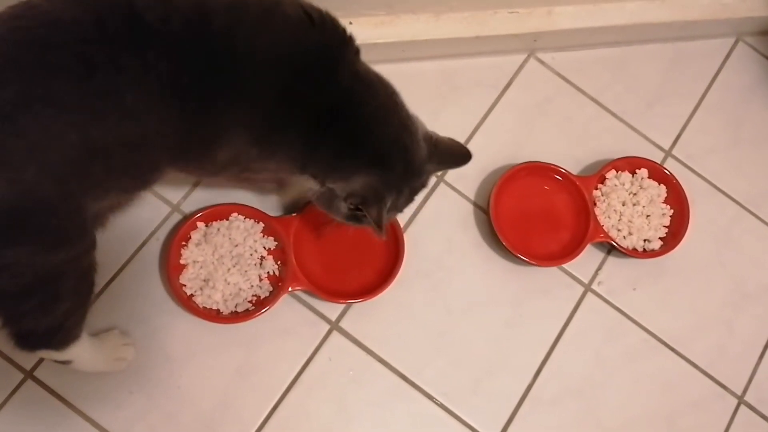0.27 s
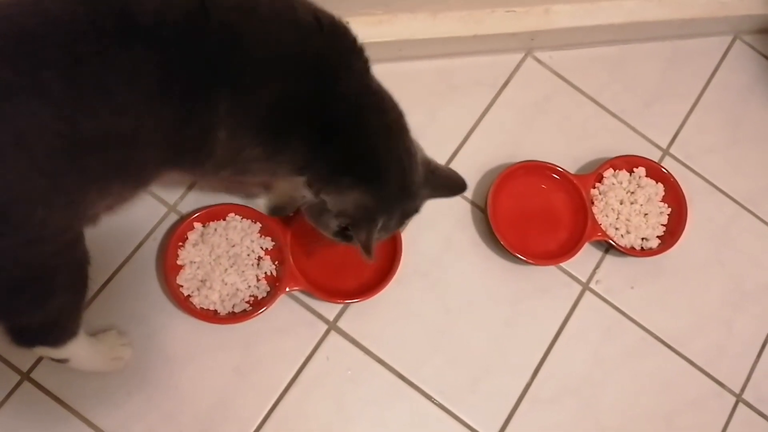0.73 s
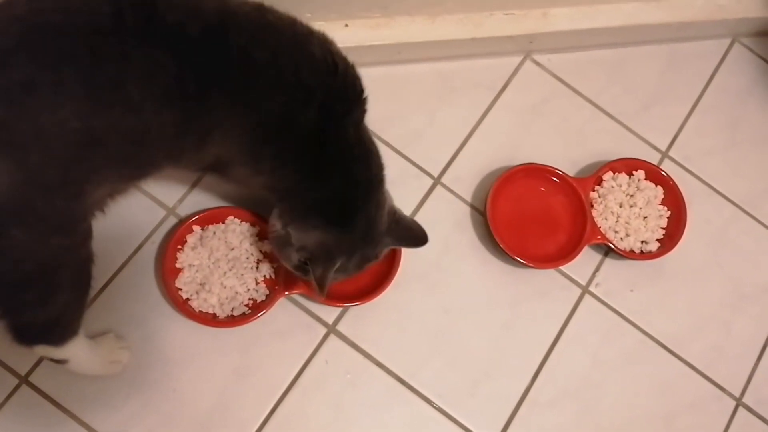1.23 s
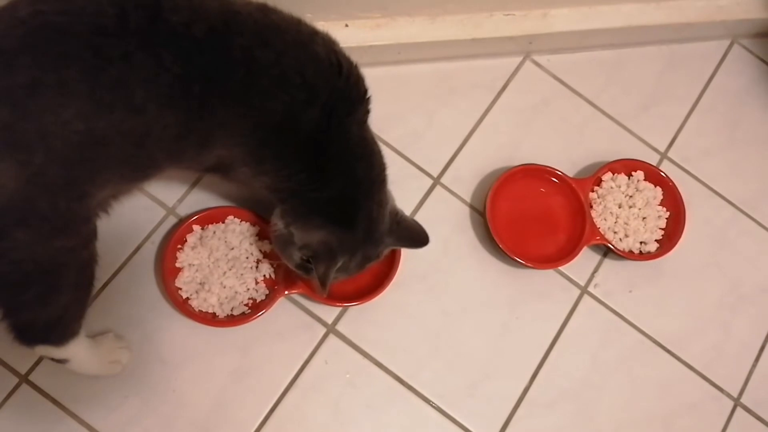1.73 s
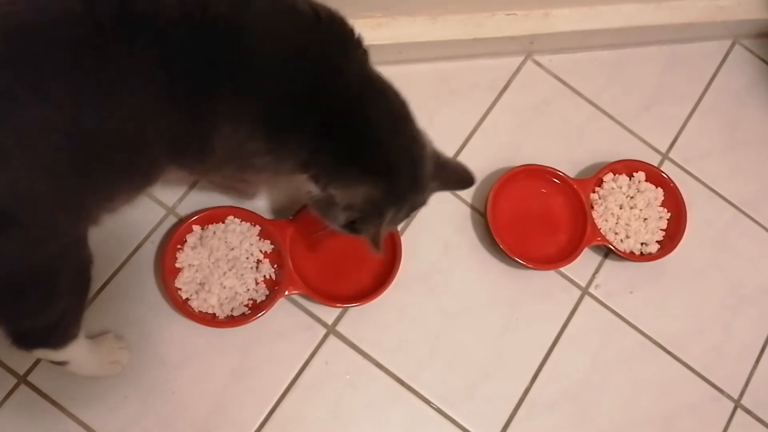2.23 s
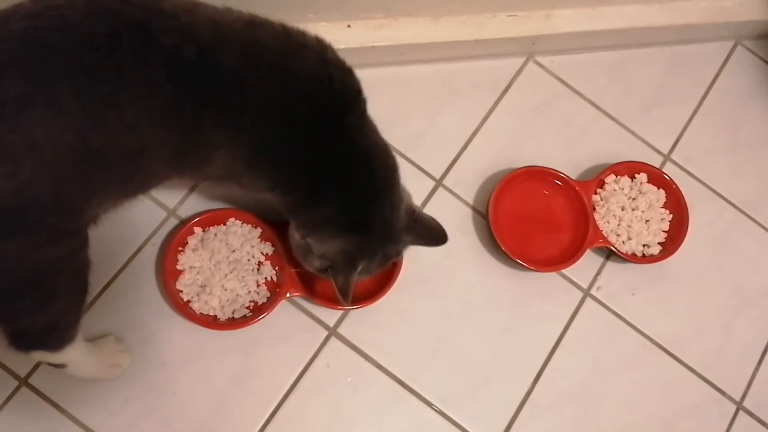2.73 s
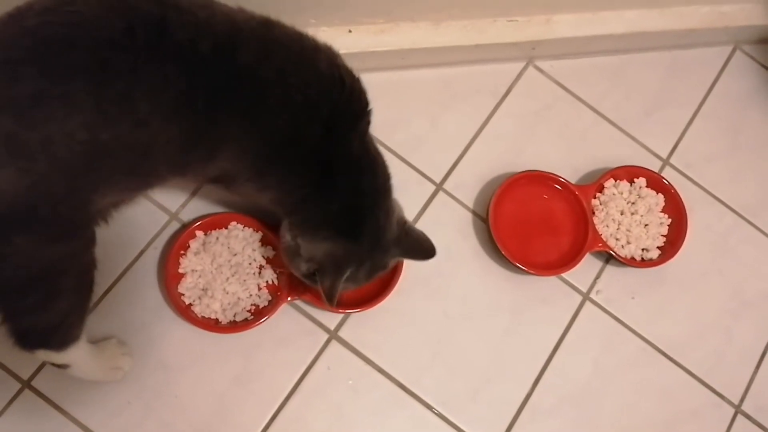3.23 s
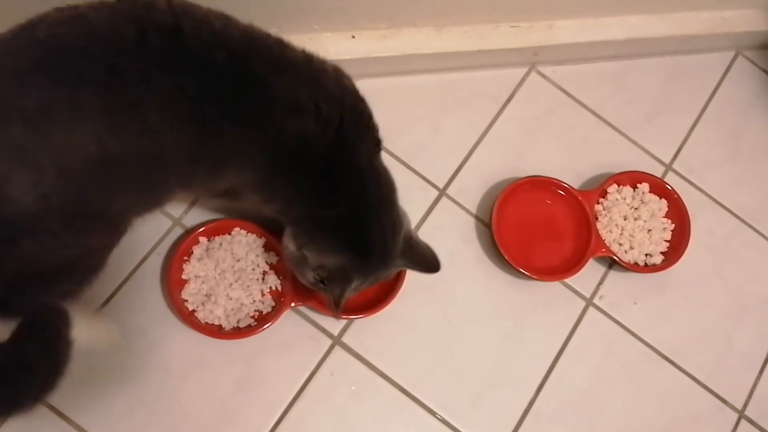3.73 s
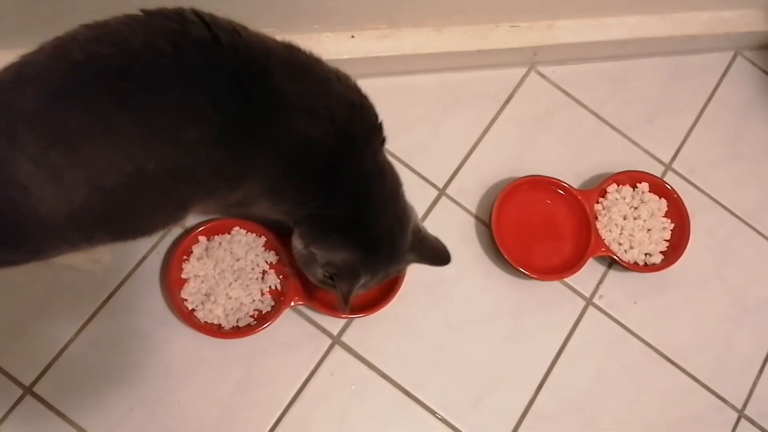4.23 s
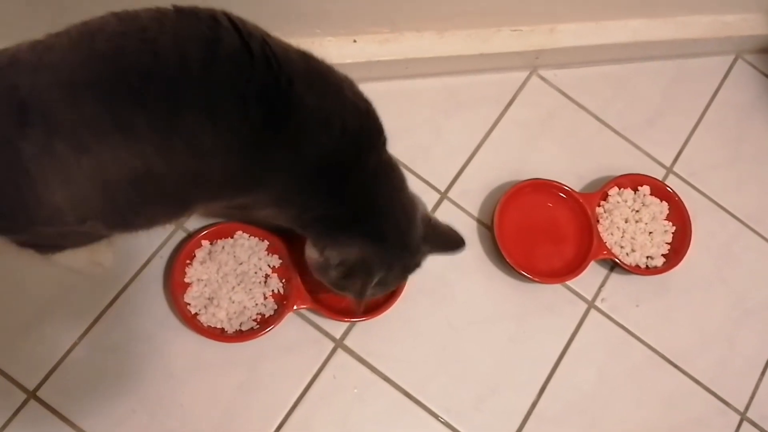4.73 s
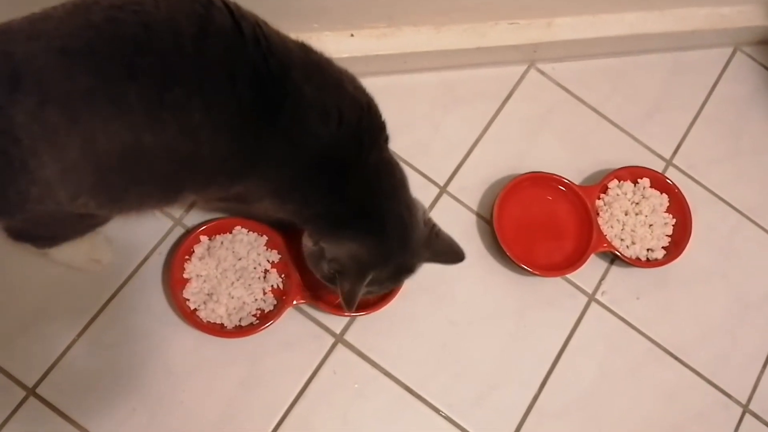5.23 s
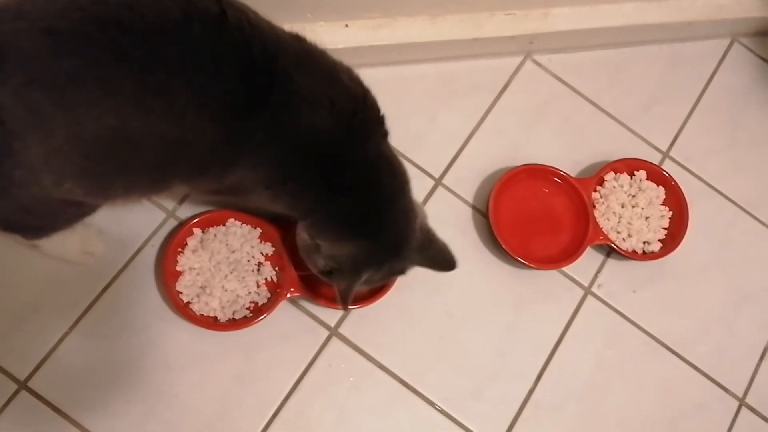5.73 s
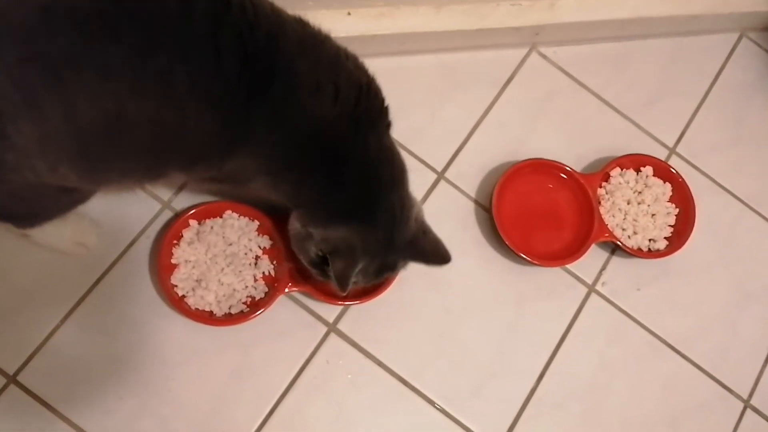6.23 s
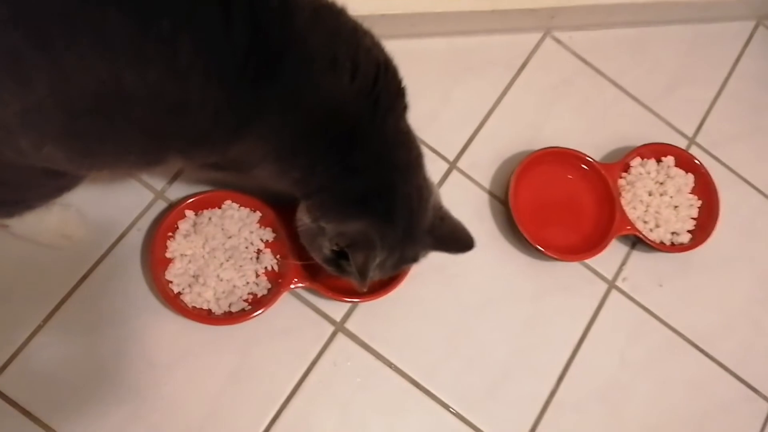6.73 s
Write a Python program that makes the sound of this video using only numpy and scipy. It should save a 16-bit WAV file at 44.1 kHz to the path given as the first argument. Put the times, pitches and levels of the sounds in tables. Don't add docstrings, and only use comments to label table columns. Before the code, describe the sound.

A glazed bowl is nudged, then rocks and clatters on hard tile with a thin ring, followed by tiny wet cat licks.

```python
import sys
import numpy as np
from scipy import signal
from scipy.fft import rfft, irfft
from scipy.io import wavfile
from scipy.ndimage import uniform_filter1d

SR = 44100
rng = np.random.default_rng(int(sys.argv[2]) if len(sys.argv) > 2 else 0)


def master(y):
    cut = np.clip(np.atleast_2d(y).T, -1, 1)
    pcm = np.round(cut * 32767)
    wavfile.write(sys.argv[1], SR, pcm.astype(np.int16))


def to_linear_factor(level_db):
    exponent = np.asarray(level_db, float) / 20
    return 10 ** exponent


N = 307597

# frequency in Hz, level in dB per Hz.
QUIET_COLOUR = [(8.8, -35), (15, 10.5), (38, 0.5), (66, -5.5), (140, -11), (182, -11.5), (435, -15),
                (489, -16), (534, -15.5), (982, -19), (1810, -22), (2030, -21.5), (5140, -29.5),
                (14200, -46.5), (15500, -50)]
QUIET_DB = -69
SETTLES_S, SETTLES_DB = 6.4, -2

# frequency in Hz, time to fall 60 dB in seconds, level in dB.
ROOM_RINGS = [(150, 0.37, -4), (599, 0.47, -0.5), (2340, .27, -1), (8900, .2, 0.5)]

# frequency in Hz, level in dB per Hz.
SWISH_COLOUR = [(1760, -30.5), (3000, -4), (5640, 1.5), (6220, -3.5), (6710, 1), (9650, -2), (11000, -6),
                (14300, -40.5), (22000, -120)]
# time of the peak in seconds, level in dB, rise in seconds,
# fall in seconds, low part in dB. Rise and fall each span 20 dB.
BRUSHES = [(.098, -86, 0.0045, 0.12, -11), (.318, -75, 0.36, .2, 13.5), (.734, -63.5, 0.04, 0.084, 14),
           (.81, -87, 0.043, 0.61, 18.5), (1.914, -81, .015, 0.14, 16), (1.952, -82.5, 0.055, 0.12, 8),
           (2.258, -64, 0.043, 0.094, 11), (2.896, -71, 0.054, 0.11, -12), (2.944, -72, 0.079, 0.082, -15),
           (3.904, -80.5, 0.066, 0.051, -2.5)]
# time of the peak in seconds, level in dB,
# rise in seconds, fall in seconds, low part in dB.
SLOSHES = [(.61, -73, 0.0055, 0.22, 15.5), (2.15, -69.5, 0.0068, 0.26, 9.5), (2.562, -59, .02, 0.074, 2),
           (4.678, -82.5, 0.027, 0.044, 19), (4.748, -71.5, 0.016, 0.12, 18.5),
           (4.804, -73.5, 0.059, 0.034, 14), (5.078, -81, .07, .14, 3), (5.124, -78.5, .05, 0.057, -4),
           (5.304, -85, .004, .1, 22), (5.63, -89, .02, .1, 20), (3.145, -84, .03, .05, 5),
           (5.775, -82, .003, .03, 15.5), (3.746, -90, .003, .03, 22), (5.93, -91, .003, .03, 24),
           (6.495, -93, .003, 0.03, 23), (6.66, -95, .004, .03, 20), (6.718, -90, .003, .03, 23)]
BRUSH_TOP_DB, BRUSH_PAN_DB = -12, 2.5
SLOSH_TOP_DB, SLOSH_PAN_DB = -24, 1.1

# start in seconds, peak in dB, pitch in Hz, length in seconds,
# left minus right in dB.
SPRAY = [(.61, -61.5, 5060, .03, 0), (.612, -66, 7600, .02, 3), (2.152, -60, 5100, .03, 3),
         (3.744, -70, 1190, .003, 5), (4.672, -64, 5200, .012, 0), (4.68, -64, 2900, .006, 0),
         (4.686, -63, 1860, .016, 3), (4.745, -60, 984, .014, 0), (4.748, -65, 491, .013, 0),
         (4.75, -62, 7300, .01, -4), (4.752, -65, 707, .011, 0), (4.765, -55, 3470, .0073, -16),
         (4.791, -64, 4800, .017, -11), (4.806, -51.5, 1690, .012, -3), (4.809, -55, 2020, .0083, 3),
         (4.815, -57, 2080, .01, -3), (4.838, -65, 1525, .035, -3), (5.05, -63, 3020, .013, -6),
         (5.067, -63, 5540, .012, -3), (5.08, -62, 5220, .018, 4), (5.085, -64, 3260, .0084, -6),
         (5.104, -59, 4670, .028, -5), (5.11, -72, 7500, .004, -3), (5.112, -67, 2950, .01, -3),
         (5.301, -65, 1400, .0067, 0), (5.305, -73, 3400, .005, 0), (5.306, -69, 2770, .012, -3),
         (5.355, -66, 7700, .006, 3), (5.621, -69.5, 2560, .019, -3), (6.717, -73, 1060, .002, 3)]
# start in seconds, peak in dB, pitch in Hz, left minus right in dB.
BUBBLES = [(3.419, -76, 2640, 5.5), (3.659, -75, 2260, 5), (3.887, -66.5, 2160, 6), (3.947, -68.5, 963, 2),
           (4.049, -74, 2180, 11), (4.094, -69.5, 2440, 7), (4.182, -63.5, 2120, 3), (4.319, -74, 2190, 1),
           (4.521, -71, 2180, 2), (4.749, -57, 2395, -2), (4.792, -44.5, 1492, -8), (4.823, -66, 1440, 4.5),
           (5.112, -58.5, 2080, -1.5), (5.358, -60, 2200, 3.5), (5.393, -66, 2430, -3),
           (5.615, -75.5, 970, -1), (5.651, -74, 828, -3), (5.776, -70, 2275, 1), (5.925, -79, 957, 3),
           (6.005, -68.5, 2233, 4), (6.141, -63.5, 2244, -1), (6.261, -72.5, 2050, -3),
           (6.494, -74, 960, 8), (6.642, -75.5, 2305, -5.5), (6.717, -72, 960, 1)]
# start in seconds, peak in dB, centre in Hz, left minus right in dB.
TICKS = [(.0986, -62, 5000, 3), (0.735, -51.5, 1500, 1), (1.9125, -67, 3500, 4), (3.7452, -61, 1500, 7),
         (3.947, -60, 1300, 4), (5.62, -69, 1300, -1), (5.652, -67, 1100, -3), (5.93, -69, 1500, -0.5),
         (6.495, -71, 1300, 5), (6.717, -67.5, 1307, 0)]
# start in seconds, peak in dB, middle mouth resonance in dB,
# top mouth resonance in dB, left minus right in dB.
SMACKS = [(0.0986, -65.5, -5, 1.5, 9), (0.61, -49.5, 1, -8.5, 2), (1.913, -57, -26, -25, 6),
          (2.152, -51, 2, 0, 5.5), (3.7455, -72, -9, -21, 10), (4.681, -49, -37, -31, 0),
          (4.769, -46.5, -32, -27, -4), (5.045, -59, -17, -25, 0), (5.1109, -66, 9, -29, -9),
          (5.303, -58.5, -24, -18, -5), (5.569, -75, -11, 6, 2.5), (5.7733, -65.5, -9, -23, 5)]
# frequency in Hz, width in Hz.
MOUTH = [
    (2400, 870),
    (5100, 480),
    (8500, 3100),
]

# start in seconds, level in dB, the spot struck.
CLINKS = [(0.733, -58, "edge"), (0.989, -71, "lip"), (2.2, -65, "flank"), (2.255, -68, "side"),
          (2.259, -61, "flank"), (2.26, -59, "edge"), (2.285, -52.5, "tile"), (2.286, -70, "splash"),
          (2.328, -60, "tile"), (2.33, -66, "side"), (2.37, -65, "tile"), (2.411, -61, "tile"),
          (2.447, -67, "tile"), (2.482, -67, "tile"), (2.516, -62, "tile"), (2.536, -62.5, "flank"),
          (2.563, -47, "blow"), (2.583, -54, "flank"), (2.602, -54, "tile"), (2.648, -55.5, "tile"),
          (2.65, -60.5, "side"), (2.696, -51, "tile"), (2.712, -69.5, "side"), (2.744, -62, "tile"),
          (2.781, -63, "tile"), (2.827, -59, "tile"), (2.862, -64.5, "tile"), (3.118, -70.5, "far side"),
          (3.138, -76, "far side"), (3.147, -70, "far lip"), (4.79, -68.5, "splash"), (4.83, -76, "splash"),
          (5.357, -73.5, "tip"), (5.385, -75, "splash")]
SPOTS = {"tile": (-2.5, -16.5, -35.5, -36.5, -42, -21, -44.5),
         "blow": (2.5, -12, -23, -17.5, -30.5, -1, -28.5), "lip": (-2, 0.5, -18, -1, -15, 0, -23),
         "flank": (-20.5, -1, -30, -30.5, -32.5, -7, -34.5), "edge": (-39.5, -32, -25, -23, 0, -30, -21),
         "tip": (-27, -26, -2, -2, -24, -25, -12), "splash": (-30, -24.5, 0, -29, -30, -29, -24),
         "far lip": (-13, -13, -10.5, 0, -13, -25, -20), "side": (-18, -9, -15, -21, -28, 1, -25),
         "far side": (-25, -2.5, -23, -9.5, -10, -22, -20)}
# frequency in Hz,
# time to fall 60 dB in seconds, level in dB.
RIM = [
    [(2988, 0.29, 1.5), (2396, 0.33, 1)],
    [(3700, .3, 3)],
    [(5190, .25, 2)],
    [(5780, 0.16, 2.5), (5735, .06, -6), (7295, .14, -0.8), (11640, .1, -14.5)],
    [(9610, 0.092, 1)],
    [(4184, .2, -5), (4240, 0.13, -7)],
    [(7800, .15, 0.5), (6815, .2, -4.5), (8140, .14, -6.5), (9200, .18, -5), (10470, .15, -12)],
]
# from and until, in seconds.
RIM_HELD_S = (2.89, 3.1)

# frequency in Hz, level in dB, time to fall 60 dB in seconds.
BODY = [
    [(115, -13, 0.55), (196.3, -4, .2), (241.3, -11.5, .11)],
    [(300, -9, 0.04), (336.4, -4.5, 0.11), (366.8, 2, 0.2), (388, -4, 0.051)],
    [(448, -9, 0.074), (449.4, 3, .14), (475, 1.5, 0.15)],
    [(536.6, 2, .12), (584.4, -2, 0.16), (626, -9.5, 0.076), (724, -15.5, .04)],
    [(906.5, -2.5, .07), (866, -8, .05), (945, 0, .08), (1014, -11, .04), (1118, -15, 0.035)],
    [(1248, -4, .09), (1296, -12, .06), (1319.7, 4, 0.11), (1440, -14.5, 0.032)],
    [(1474, -0.5, .068), (1530, -6.5, 0.18), (1547, 1.5, 0.13), (1628, -9, 0.056)],
    [(1792, -4.5, 0.072), (1860, -5.5, .04), (1918, -7.5, .09), (2050, -5, .07), (2127, -14, 0.038)],
    [(2247, -7, 0.057), (2318, -4.5, .08), (2363, 1, 0.049), (2420, -2.5, 0.14)],
    [(2515, -5.5, 0.046), (2586, -3, .06), (2700, -6, 0.04), (2780, -5.5, 0.046), (2880, -8.5, .05)],
    [(3150, 0, .07), (3363, 7.5, .08), (3530, 11, .06)],
]
# lowest in Hz, highest in Hz.
BODY_BANDS = [(95, 240), (230, 470), (300, 680), (430, 850), (720, 1200), (1080, 1520), (1320, 1800),
              (1650, 2250), (2080, 2600), (2350, 2980), (3050, 3650)]
BODY_PAN_DB = (2.5, 3.5, 3.5, -3, 0.5, 0, 0.5, -1.5, 5, -1, -1.5)
STIFFENING = (0.0046, 0, 0.035, 0.025, .07, .03, 0.052, .01, .003, 0, 0.016)
# time in seconds, firmness from 0 to 1.
SEAT = [(1.5, 0.8), (2.27, 0.57), (2.52, 0.82), (2.56, 0.01), (2.7, .05), (2.8, 0.46), (2.95, 0.95),
        (3.03, 0.8)]
# start in seconds, peak in dB,
# wall tones in dB, flank tones in dB, left minus right in dB.
NUDGES = [(.298, -49, -15, -18, 11), (.329, -50.5, -16, -6.5, 3), (.364, -54, -22, -12, 11),
          (.398, -58.5, -25, -15, 3), (.425, -66, -25, -12, 3), (.732, -43.5, -6.5, -11, 12.5),
          (.755, -49, -3, -6, 1), (.775, -52, -3.5, -2.5, -6), (.795, -48, -10.5, -8, 0),
          (.822, -50.5, -18, -4.5, 6), (.862, -58, -25, -6, 7), (.89, -57.5, -25, -12, 5),
          (.915, -65, -23, -12, 5)]
# start in seconds, peak in dB, hardness as middle tones in dB,
# wall tones in dB, left minus right in dB.
ROCKS = [(2.272, -28, -1, -13, 7.5), (2.321, -30, -6, -5, 3), (2.363, -31.5, -4, -8, 5),
         (2.404, -33, -7, -7, 7), (2.444, -33.5, -5, -2.5, 4), (2.478, -35.5, -11, -4, -1),
         (2.511, -32.5, -6.5, -5, 4), (2.535, -28, 2, -19.5, -8), (2.563, -27.5, -3, -11.5, -9.5),
         (2.575, -26, 3.5, -5, 6.5), (2.589, -27, -3, -11, -2), (2.602, -29, -4, -3, -4),
         (2.637, -27.5, 0.5, -12, 4.5), (2.686, -25.5, -4, -14, 5), (2.738, -30.5, -9, -10, -2),
         (2.776, -31.5, -4.5, -3.5, 7.5), (2.817, -33, -4, -8.5, 4), (2.857, -36.5, -8, -0.5, 1),
         (2.891, -39, -14, -4, 4), (2.922, -44.5, -14, -4, -1), (2.952, -39, -16, -5.5, 8),
         (2.982, -42, -16, -5.5, 2), (3.011, -52.5, -27, -11, 0.5), (3.041, -51.5, -25, -16, 8),
         (3.066, -53, -28.5, -16, 7), (3.1, -58, -31.5, -23, 6), (3.135, -58, -31, -26, 6),
         (3.165, -61, -30, -26, 6)]
# start in seconds, peak in dB, left minus right in dB.
TOES = [(2.286, -34, 5), (2.3273, -38, -4), (2.368, -38.5, 2), (2.4078, -39.5, -0.5), (2.4443, -42, -1.5),
        (2.4822, -48.5, -2), (2.515, -47, -5.5), (2.534, -47.5, 2), (2.5625, -22.5, 10.5), (2.5795, -28, 0),
        (2.5917, -34, -6), (2.6022, -30, -1), (2.6468, -30.5, -0.5), (2.695, -31, 7.5),
        (2.7441, -37.5, -1.5), (2.7856, -38.5, 10), (2.8255, -41.5, 4.5), (2.8605, -50, 7),
        (2.8956, -55, -2), (2.9534, -61, 9)]
NUDGE_ROLL_S, HEEL_ROLL_S, TOE_ROLL_S = 0.0077, 0.0037, 0.0013
SCATTER = 0.008
LEANS_UNTIL_S = 1.5


def level(x, db):
    return x * to_linear_factor(db) / np.sqrt(np.mean(x ** 2))


def band(x, hz, width):
    return signal.lfilter(*signal.iirpeak(hz, hz / width, SR), x)


def band_twice(x, hz, width):
    return band(band(x, hz, width), hz, width)


def mode(x, hz, t60):
    pole = np.exp(2j * np.pi * hz / SR - np.log(1000) / (t60 * SR))
    return signal.lfilter([1], [1, -pole], x).imag


def colour(shape, points):
    hz, db = np.transpose(points)
    f = np.maximum(np.fft.rfftfreq(N, 1 / SR), 1)
    gain = to_linear_factor(np.interp(np.log(f), np.log(hz), db))
    return irfft(rfft(rng.standard_normal(shape)) * gain, N)


def add(out, s, sound, db, pan_db):
    i = int(s * SR)
    sound = sound[:N - i] * to_linear_factor(db) / np.abs(sound).max()
    out[:, i:i + len(sound)] += sound * to_linear_factor(np.array([[pan_db], [-pan_db]]) / 2)


def quiet():
    swell = uniform_filter1d(rng.standard_normal(N), SR // 8) * np.sqrt(SR // 8)
    hiss = level(colour((2, N), QUIET_COLOUR), QUIET_DB + 2.5) * to_linear_factor(np.array([[-1.2], [1.2]]))
    rumble = level(band(rng.standard_normal(N), 18, 30) * to_linear_factor(2 * swell), -72.5)
    hum = level(band_twice(rng.standard_normal(N), 210, 40) * to_linear_factor(1.5 * swell[::-1]), -85.5)
    late = np.arange(N) / SR - SETTLES_S
    eased = to_linear_factor(SETTLES_DB * np.clip(late / 0.33, 0, 1))
    return eased * (hiss + (rumble + hum) * to_linear_factor(np.array([[-1.5], [1.5]])))


def room(x, wet_db, shelter=0.75):
    t = np.arange(SR // 2) / SR
    tail = np.zeros((2, len(t)))
    for hz, t60, db in ROOM_RINGS:
        fade = to_linear_factor(db - 60 * t / (t60 * shelter)) / np.sqrt(t60)
        tail += band(rng.standard_normal((2, len(t))), hz, 0.67 * hz) * fade
    tail *= t > 0.003
    tail = tail / np.sqrt(np.sum(tail ** 2, axis=1, keepdims=True))
    return to_linear_factor(wet_db) * signal.fftconvolve(x, tail, axes=1)[:, :N]


def swish():
    out, t = np.zeros((2, N)), np.arange(N) / SR
    grain = to_linear_factor(2.0 * uniform_filter1d(rng.standard_normal(N), 64) * 6.5)
    high = level(colour((2, N), SWISH_COLOUR) * grain, 0)
    low = level(band_twice(rng.standard_normal((2, N)) * grain, 1900, 3600), -8.5)
    top = level(band_twice(rng.standard_normal((2, N)), 12500, 3500) * grain, 0)
    for rows, top_db, pan_db in ((BRUSHES, BRUSH_TOP_DB, BRUSH_PAN_DB),
                                 (SLOSHES, SLOSH_TOP_DB, SLOSH_PAN_DB)):
        for s, db, rise_s, fall_s, low_db in rows:
            span = slice(max(int((s - 2 * rise_s) * SR), 0), int((s + 2 * fall_s) * SR))
            late = t[span] - s
            swell_db = db - 20 * np.maximum(-late / rise_s, late / fall_s)
            swell_db = swell_db + np.array([[0.5], [-0.5]]) * pan_db
            hairs = high[:, span] + low[:, span] * to_linear_factor(low_db) + top[:, span] * to_linear_factor(top_db)
            out[:, span] += to_linear_factor(swell_db) * hairs
    return out


def spray():
    out, t = np.zeros((2, N)), np.arange(SR // 8) / SR
    for s, db, hz, length, pan_db in SPRAY:
        swarm = rng.standard_normal(len(t)) * t * np.exp(-t / (0.52 * length))
        add(out, s, band_twice(swarm, hz, 0.16 * hz), db, pan_db)
    return out


def bubbles():
    out, t = np.zeros((2, N)), np.arange(SR // 8) / SR
    for s, db, hz, pan_db in BUBBLES:
        life = 14 / hz
        wobble = uniform_filter1d(rng.standard_normal((2, len(t))), 96, axis=1) * np.sqrt(96)
        glide = 0.97 * t + 0.0354 * t ** 2 / life
        phase = 2 * np.pi * hz * glide + 0.67 * wobble[0]
        pocket = to_linear_factor(3.7 * wobble[1]) * np.sin(phase) * np.exp(-t / life)
        add(out, s, band_twice(pocket, hz, 0.62 * hz), db + 3.0, pan_db)
    return out


def ticks():
    out, t = np.zeros((2, N)), np.arange(SR // 10) / SR
    for s, db, hz, pan_db in TICKS:
        touch = rng.standard_normal(len(t)) * np.exp(-t / 0.0013)
        add(out, s, band(touch, hz, 0.83 * hz), db, pan_db)
    return out


def smacks():
    out, t = np.zeros((2, N)), np.arange(SR // 10) / SR
    for s, db, mid_db, top_db, pan_db in SMACKS:
        tear = rng.standard_normal(len(t)) * (np.exp(-t / 0.0013) + 0.057 * np.exp(-t / 0.037))
        for (hz, width), rel_db in zip(MOUTH, (0, mid_db, top_db)):
            add(out, s, band_twice(tear, hz, width), db + rel_db, pan_db)
    return out


def rim():
    out, taps = np.zeros((2, N)), np.zeros((len(RIM), N))
    side_db = 2.5 * rng.standard_normal(len(RIM))
    for s, db, spot in CLINKS:
        taps[:, int(s * SR)] += to_linear_factor(db + np.array(SPOTS[spot]))
    for family, tap, pan_db in zip(RIM, taps, side_db):
        for hz, t60, rel_db in family:
            ring = band(mode(tap, hz, t60), hz, 300)
            out += ring * to_linear_factor(rel_db + np.array([[1], [-1]]) * pan_db / 2)
    t = np.arange(N) / SR
    hold = np.clip((t - RIM_HELD_S[0]) / 0.015, 0, 1) * (t < RIM_HELD_S[1])
    return out * to_linear_factor(-25 * hold)


def rocking():
    out, t = np.zeros((2, N)), np.arange(SR // 4) / SR
    rings = []
    for modes, edges in zip(BODY, BODY_BANDS):
        ring = sum(to_linear_factor(db) * mode(t == 0, hz, t60) for hz, db, t60 in modes)
        rings.append(signal.sosfilt(signal.butter(3, edges, "band", fs=SR, output="sos"), ring))
    soft = signal.butter(8, 3100, fs=SR, output="sos")
    foot, near = rng.standard_normal(4096), t[:4096]

    def land(s, db, pan_db, roll_s, families_db):
        push = (foot + 0.91 * rng.standard_normal(len(foot))) * near * np.exp(-near / roll_s)
        push = signal.sosfilt(soft, push)
        firm = np.interp(s, *np.transpose(SEAT)) - 0.5
        pitch = 1 + np.array(STIFFENING) * firm + SCATTER * rng.standard_normal(len(rings))
        seated = np.array([np.interp(t * p, t, ring) for p, ring in zip(pitch, rings)])
        struck = signal.fftconvolve(seated, push[None], axes=1)
        for ring, rel_db, side_db in zip(struck, families_db, BODY_PAN_DB):
            add(out, s, ring, db + rel_db, 0.6 * pan_db + side_db)

    for s, db, wall_db, flank_db, pan_db in NUDGES:
        families_db = (flank_db - 8.5, flank_db - 1.5, -4, flank_db - 1.5, wall_db - 0.5)
        land(s, db, pan_db, NUDGE_ROLL_S, families_db)
    for s, db, mid_db, wall_db, pan_db in ROCKS:
        families_db = (-21.0, -8, -3.5, -6.5, wall_db - 2.5, mid_db - 3.5, mid_db - 14)
        land(s, db, pan_db, HEEL_ROLL_S, families_db)
    for s, db, pan_db in TOES:
        families_db = (-28, -11.0, -11.0, -8, -7.5, -5.0, -0.6, -8.0, -3.0, -5.5, -26)
        land(s, db, pan_db, TOE_ROLL_S, families_db)
    return out


def scene():
    bowl, edge = rocking(), rim()
    cat = smacks() + ticks() + bubbles() + spray()
    sheltered = bowl * (np.arange(N) / SR < LEANS_UNTIL_S)
    direct = np.array([np.roll(bowl[0], 5), bowl[1]]) * to_linear_factor(np.array([[-1.2], [1.2]]))
    echo = room(bowl - sheltered, -5.5, shelter=0.83) + room(sheltered, -6, shelter=0.49)
    echo += room(edge, -11.0) + room(cat, -3.5, shelter=0.65)
    return quiet() + swish() + cat + edge + direct + echo


def roll_off(x):
    return signal.sosfilt(signal.butter(12, 15640, fs=SR, output="sos"), x)


def record(dry):
    cut = signal.sosfilt(signal.ellip(8, 0.2, 60, 15150, fs=SR, output="sos"), dry)
    return roll_off(cut)


dry = scene()
out = record(dry)
master(out)
```